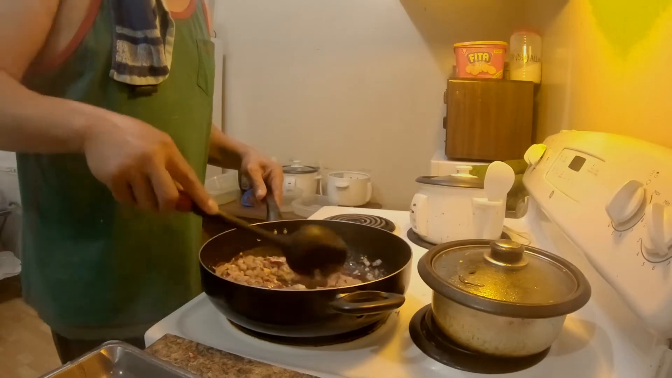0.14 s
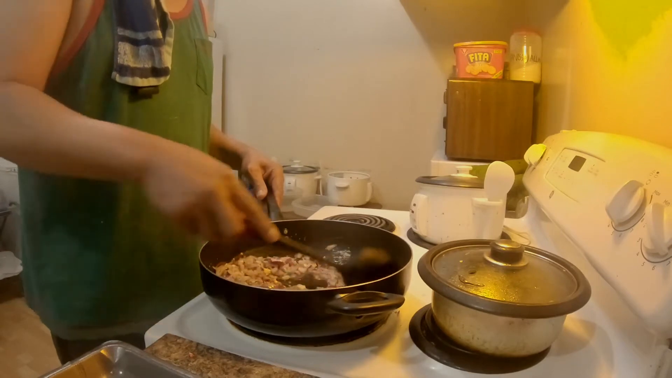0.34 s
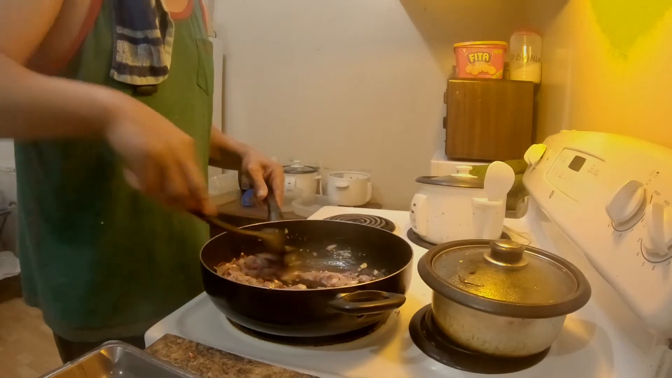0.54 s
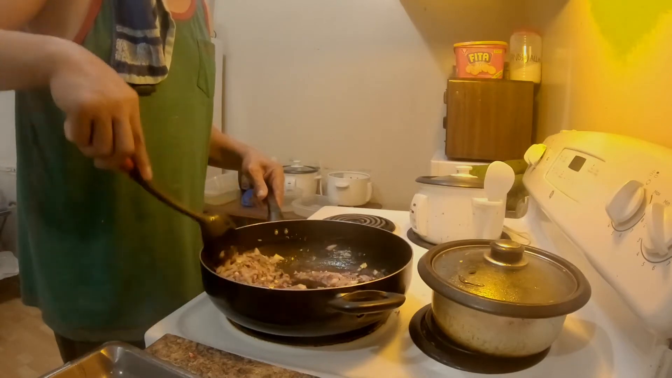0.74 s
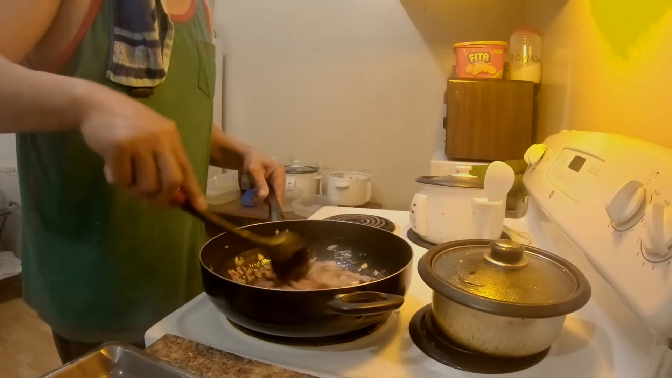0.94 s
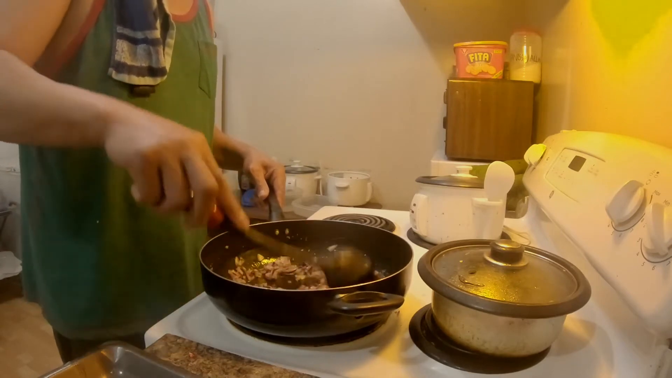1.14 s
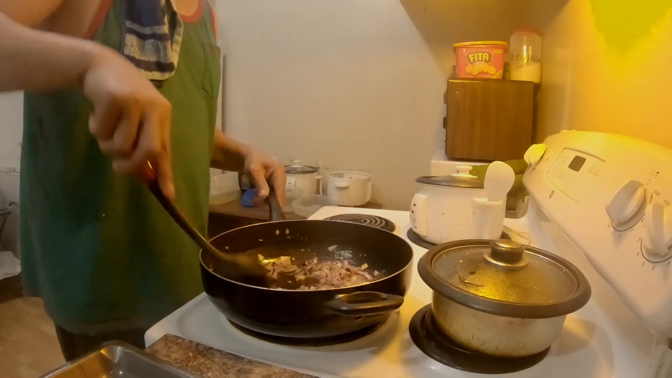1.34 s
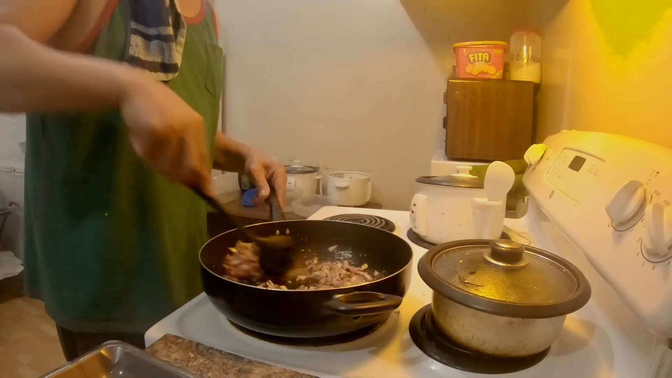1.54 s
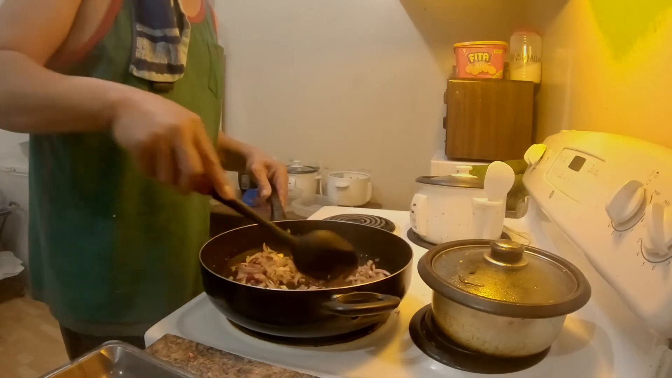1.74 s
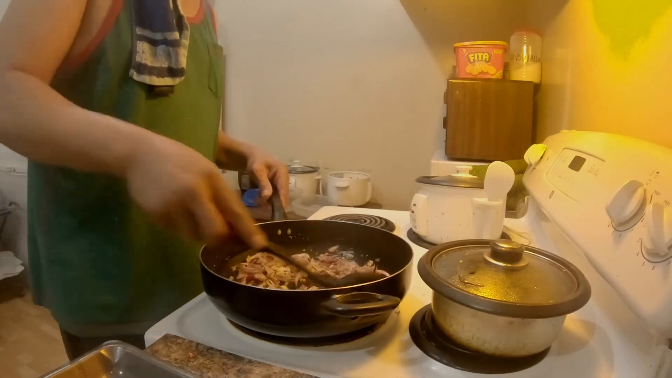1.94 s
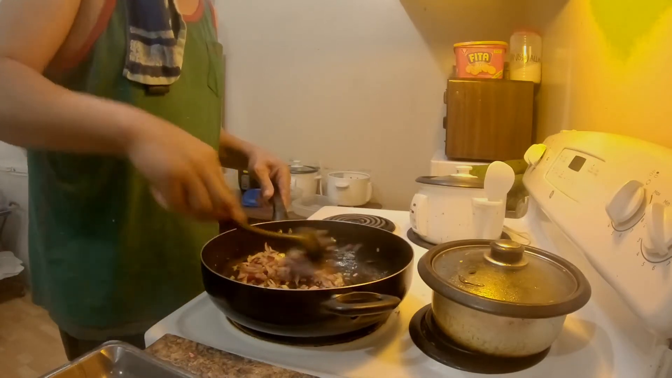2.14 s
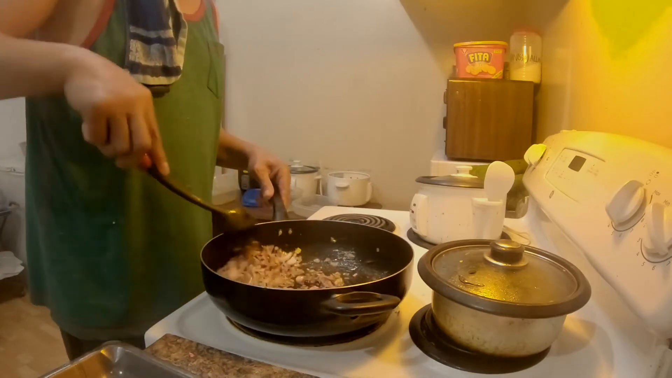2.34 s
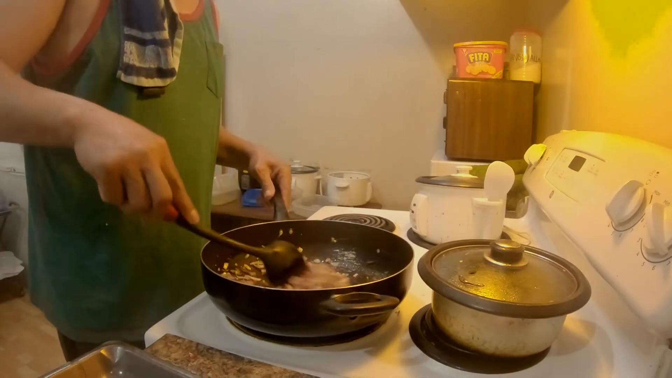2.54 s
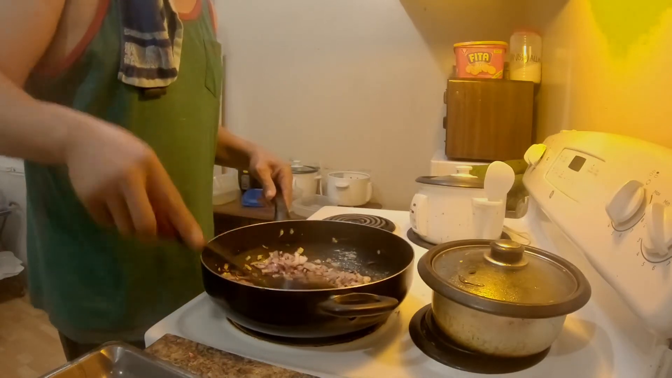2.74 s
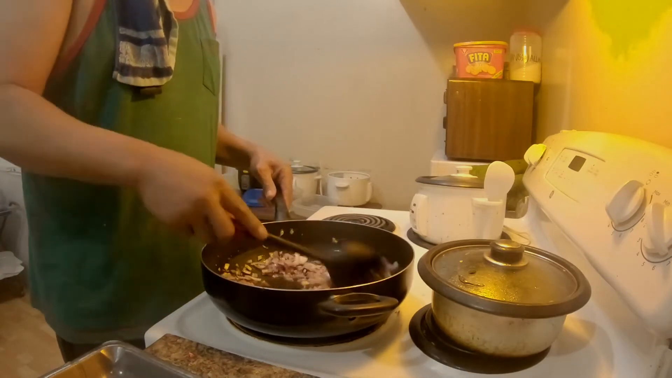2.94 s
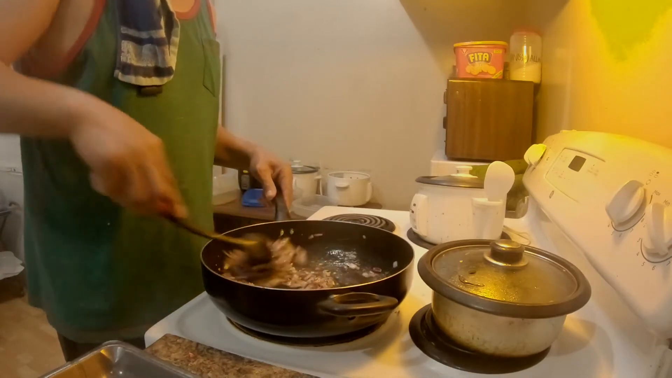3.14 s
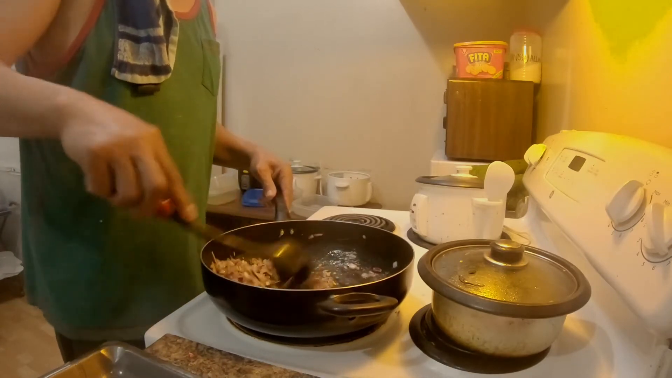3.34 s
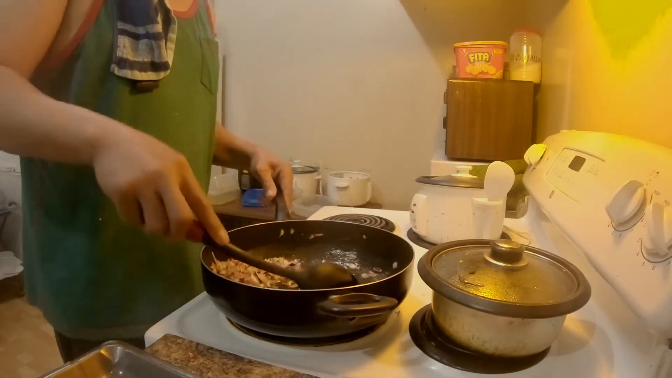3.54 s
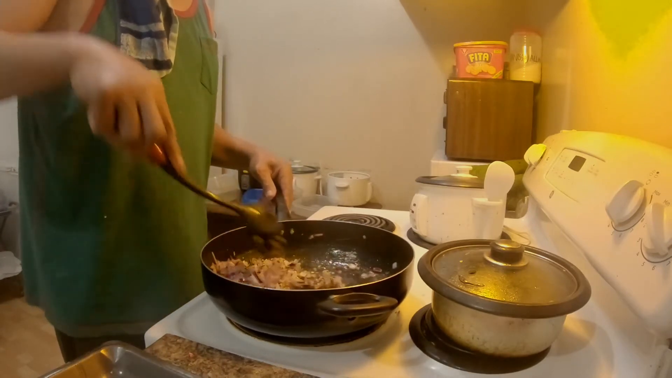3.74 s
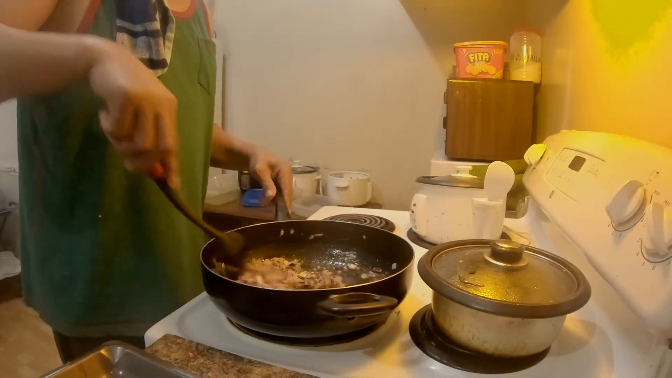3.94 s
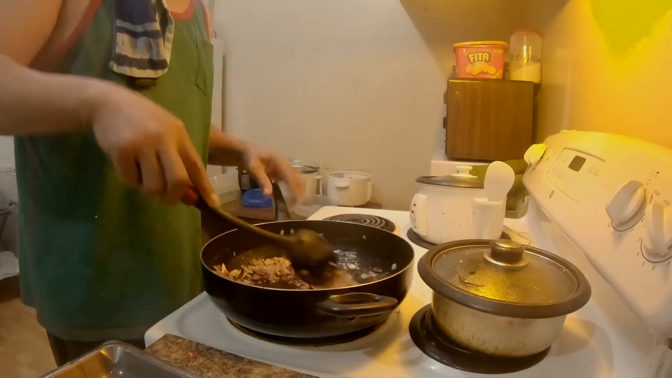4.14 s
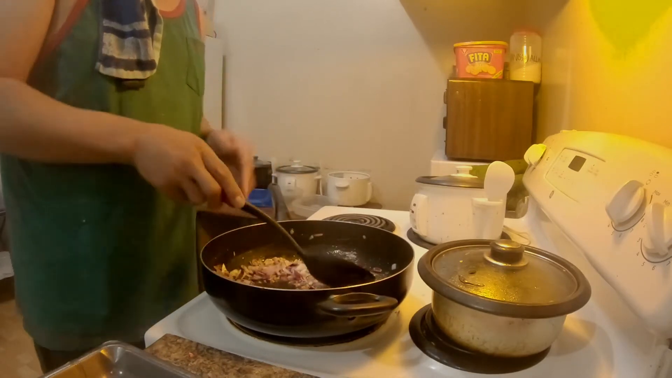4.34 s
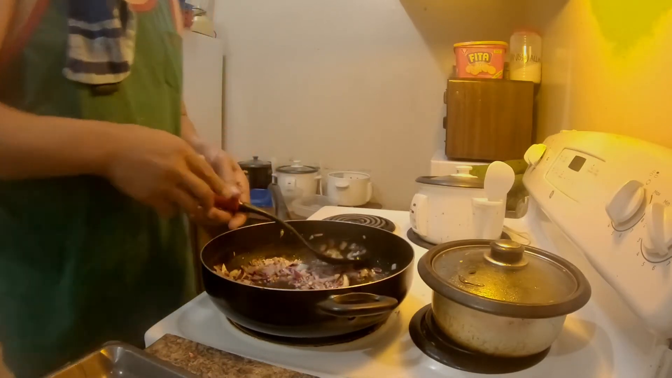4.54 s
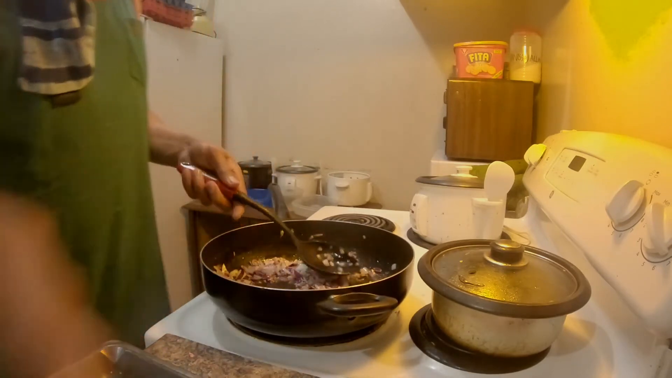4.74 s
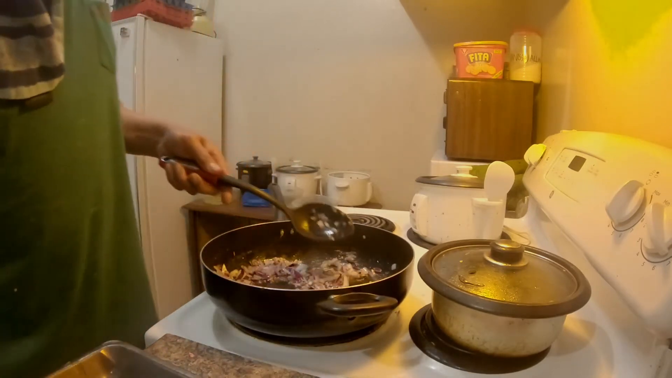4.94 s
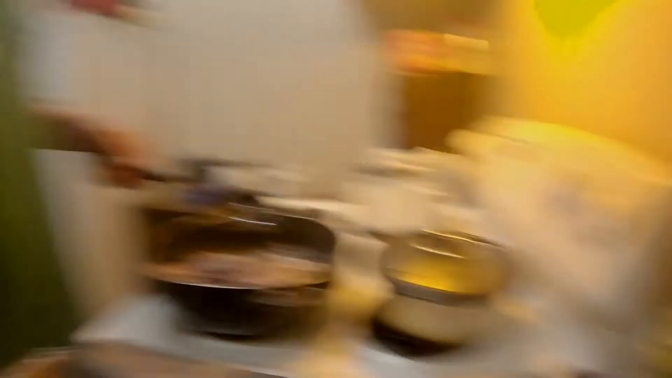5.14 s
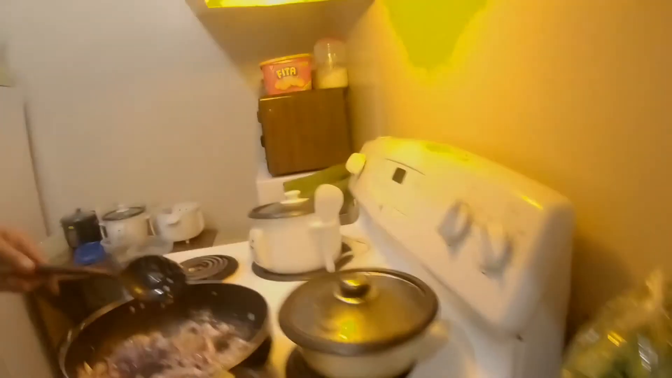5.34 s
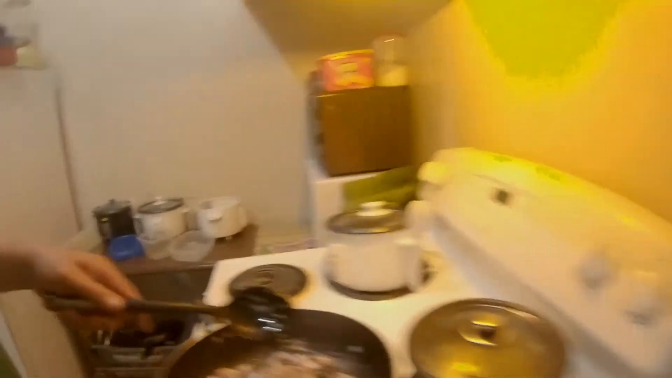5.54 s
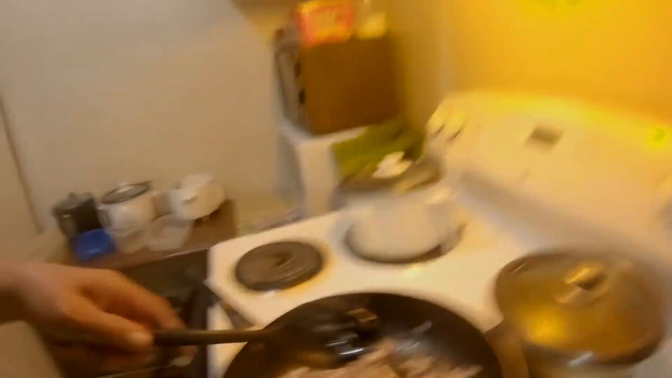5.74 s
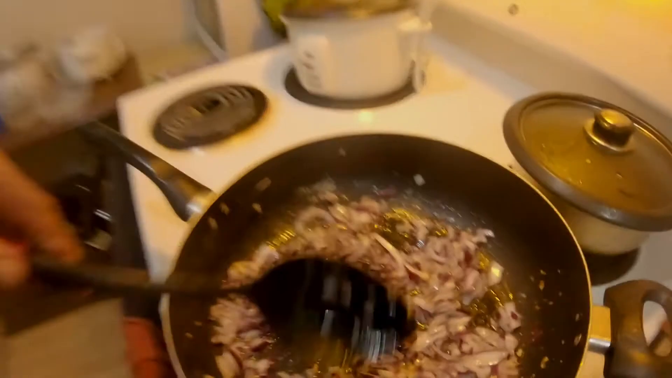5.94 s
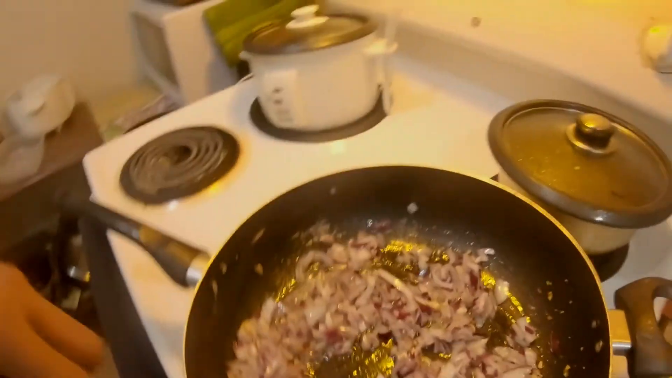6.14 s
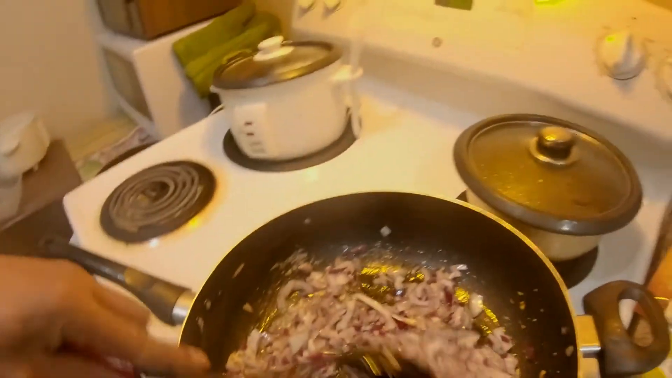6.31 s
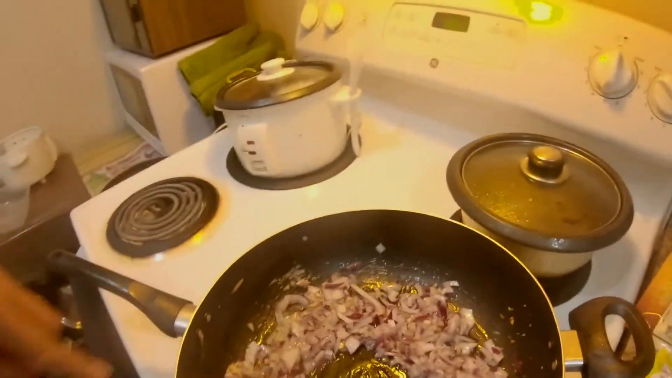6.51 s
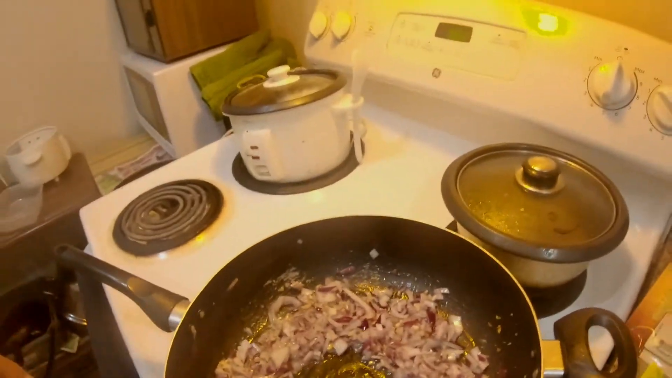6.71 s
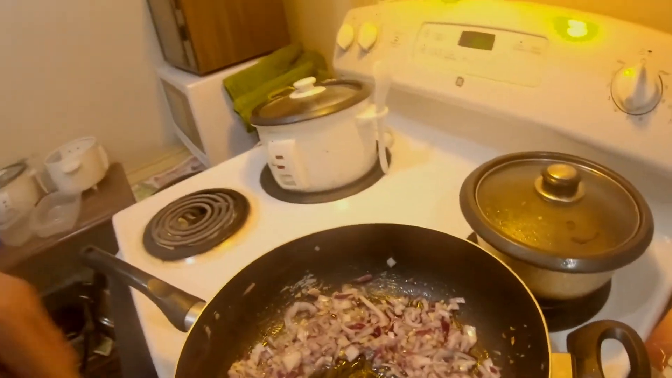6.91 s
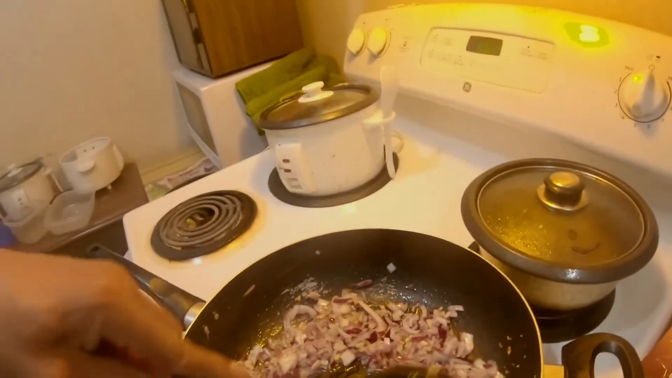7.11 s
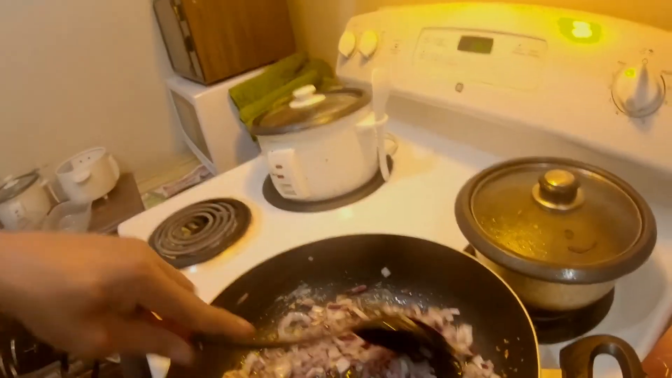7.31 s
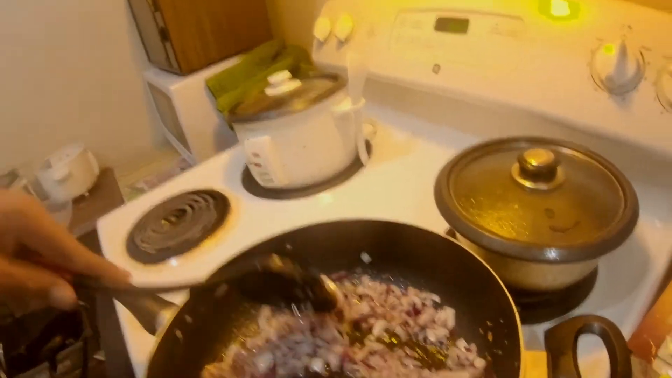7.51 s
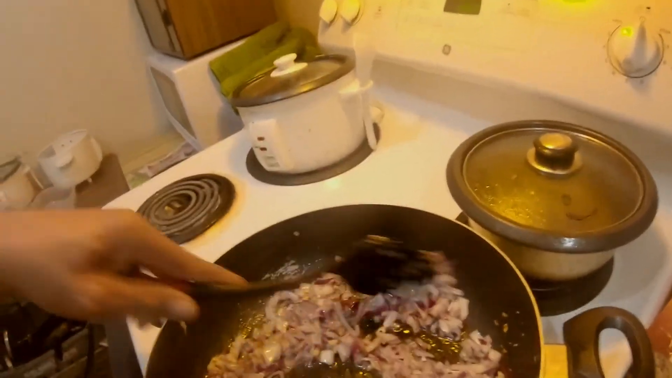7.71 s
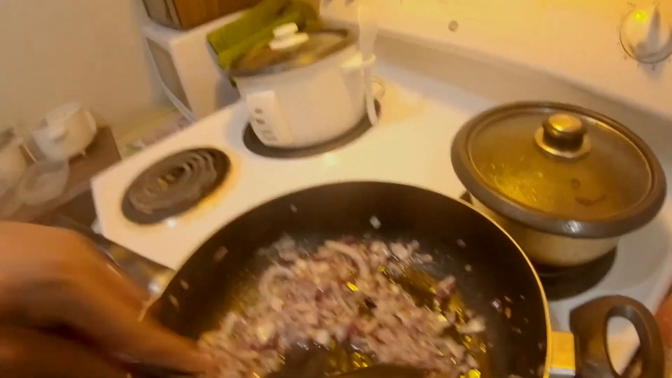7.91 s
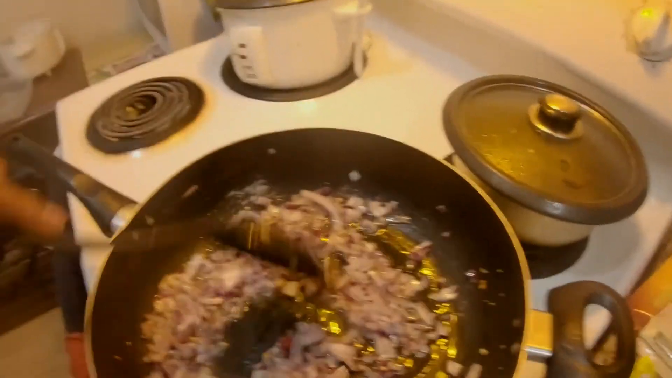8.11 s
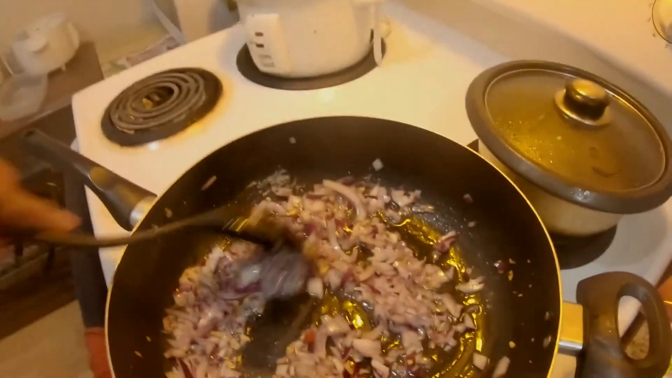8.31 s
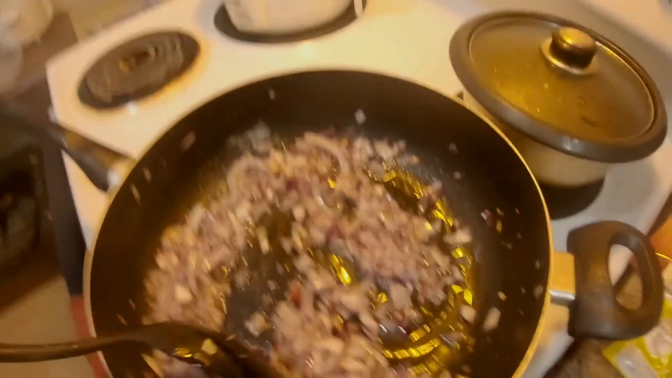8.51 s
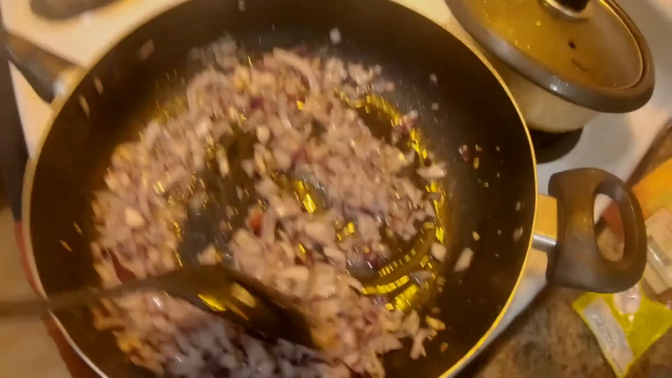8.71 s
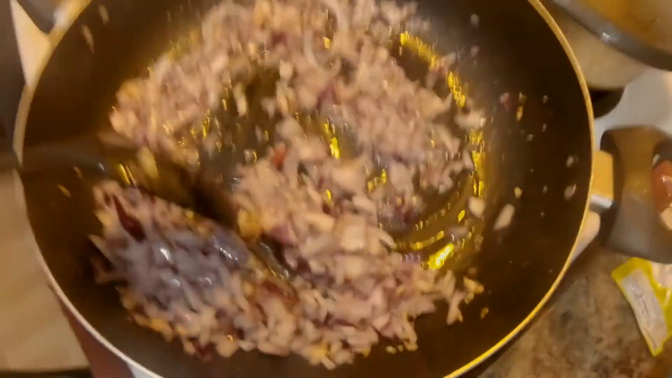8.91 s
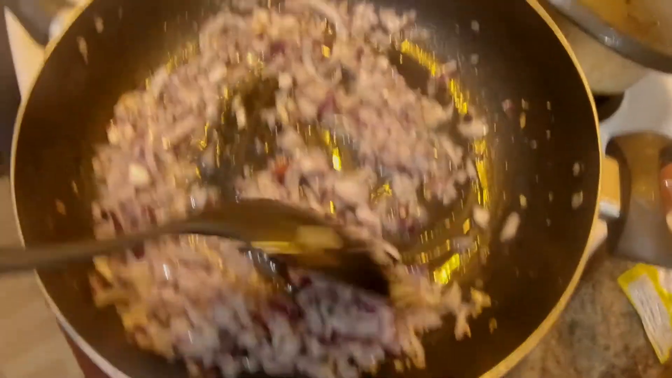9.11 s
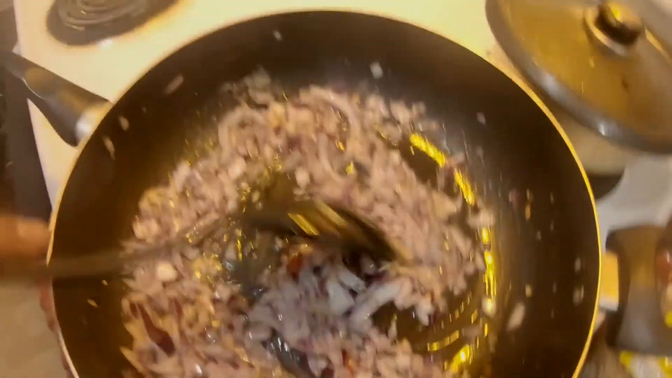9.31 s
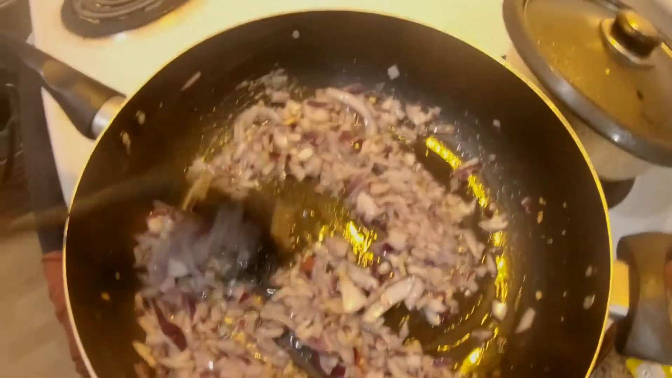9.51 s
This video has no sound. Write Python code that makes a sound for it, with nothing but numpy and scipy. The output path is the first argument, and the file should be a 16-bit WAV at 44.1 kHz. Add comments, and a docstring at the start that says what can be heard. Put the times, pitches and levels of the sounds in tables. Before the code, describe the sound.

Chopped onion fries in oil with a constant bright, crackling hiss. A spatula knocks and scrapes the metal pan, which wobbles lowly on the stove coil; drops of oil spit and bubbles pop. Halfway, the microphone is grabbed with a very loud bump and a gritty scuff, then carried over the pan. Sizzle and squeaky scrapes continue with dull finger thuds, in a small kitchen.

```python
"""First comes the hiss of chopped onion sizzling in oil, while a frying pan rocks on a stove coil below.
A spatula stirs, scraping and knocking the pan; oil spits, large bubbles pop, juice squelches.
Halfway through, the camera is picked up with a bump and a short scuff and is carried over the pan;
from then on fingers thud on its case and for about a second cover the microphone's highest treble.
Bubbles and scrapes are filtered clicks, blows are dying sines, and rumble and wobble are shaped noise."""
import sys
import numpy as np
from scipy import signal
from scipy.fft import rfft, irfft
from scipy.io import wavfile
from scipy.ndimage import uniform_filter1d

SR = 44100
rng = np.random.default_rng(int(sys.argv[2]) if len(sys.argv) > 2 else 0)


def dump(signal):
    """Clip the signal to [-1, 1] and save it as 16-bit WAV at the path in sys.argv[1]."""
    limited = np.clip(np.atleast_2d(signal).T, -1, 1)
    pcm = np.round(limited * 32767).astype(np.int16)
    wavfile.write(sys.argv[1], SR, pcm)


N = 426006
TIME = np.arange(N) / SR
LIFT_S, LIFT_TAKES_S = 4.99, 0.22  # the camera leaves its stand


def sizzle():
    """Countless tiny steam bubbles merge into a hiss; fewer, larger ones crackle out of it."""
    quick_flutter = gain_of(.85 * evened(uniform_filter1d(rng.standard_normal(N), 1200)))
    slow_surges = gain_of(.3 * evened(uniform_filter1d(rng.standard_normal(N), 3500)))
    flutter = quick_flutter * slow_surges
    hiss = evened(clicks(per_s=20000, spread_db=1.6))
    crackle = bubbles(per_s=2100, spread_db=3.8, low_hz=3800, high_hz=12000, q=4)
    pings = bubbles(per_s=45, spread_db=3.2, low_hz=6600, high_hz=10000, q=10)
    bursts = evened(flutter * (hiss + gain_of(-1) * crackle) + gain_of(-13.5) * pings)
    return steam_hiss(bursts) + sputter(hiss) + fizz(bursts, flutter)


# steam bubbles bursting in the oil: (frequency [Hz], relative density [dB per Hz])
STEAM_SPECTRUM = [(1500, -47), (2800, -60), (3700, -11.5), (4400, -2), (5000, 1.5), (5700, -1.5),
                  (7000, -13.5), (8200, -16.5), (9500, -23.5), (10800, -27.5), (14000, -53.5)]
# main hiss: (level in ordinary frying [dB], follows frying [dB per dB], change over the pan [dB],
# share of the fingers' loss that dims the whole layer)
HISS_LAYER = (-43.5, 1, 0, -0.04)


def steam_hiss(bursts):
    """The bursts reach the microphone directly and off nearby surfaces, in clusters that come and go."""
    heard = reflected(patchy(bursts, depth_db=1.0))
    return frying(*HISS_LAYER) * evened(colour(heard, STEAM_SPECTRUM))


# larger bubbles under the onion, from beside the pan: (frequency [Hz], relative density [dB per Hz])
SPUTTER_FROM_SIDE = [(200, -10), (440, -8.5), (560, -4), (720, 5.5), (900, -2), (1090, -4), (1290, -0.5),
                     (1600, -0.5), (1950, -0.5), (2250, -0.5), (2700, -1.5), (3600, -1.5), (5000, -9),
                     (9000, -18.5)]
# the same bubbles from over the pan: (frequency [Hz], relative density [dB per Hz])
SPUTTER_FROM_ABOVE = [(200, -29), (440, -2.5), (720, 2), (900, -4), (1130, 5.5), (1400, 2.5), (1750, 3.5),
                      (2250, -1), (2700, -2.5), (3400, -2), (5000, -18), (9000, -17.5)]
# sputter, same columns as HISS_LAYER: ([dB], [dB per dB], [dB], share)
SPUTTER_LAYER = (-49.5, 0.6, -0.5, 0.25)


def sputter(hiss):
    """Bubbles trapped under the onion sound lower and set the pan ringing faintly."""
    trapped = bubbles(per_s=1500, spread_db=2.8, low_hz=800, high_hz=4000, q=5, count=16)
    under_onion = hiss + gain_of(-4) * trapped
    metal = gain_of(-17) * evened(signal.oaconvolve(under_onion, ring(PAN_MODES))[:N])
    heard = reflected(under_onion)
    from_side = evened(colour(heard, SPUTTER_FROM_SIDE))
    from_above = evened(colour(heard, SPUTTER_FROM_ABOVE))
    moved = lifted()
    return frying(*SPUTTER_LAYER) * ((1 - moved) * from_side + moved * from_above + metal)


# finest bubbles: (frequency [Hz], relative density [dB per Hz])
FIZZ_SPECTRUM = [(8000, -38), (9800, -24), (11000, -26), (11500, -5.5), (12000, 2.5), (13000, -0.5),
                 (14500, -8), (15800, -16)]
# fizz, same columns as HISS_LAYER; the level is before the balance of the two ports: ([dB], [dB per dB], [dB], share)
FIZZ_LAYER = (-56, 1.18, -3, 0.5)


def fizz(bursts, flutter):
    """The shortest waves reach the two microphone ports differently, so each port adds its own prickle."""
    ports = []
    for _ in range(2):
        prickle = flutter * evened(clicks(per_s=1100, spread_db=4.8))
        ports.append(evened(colour(bursts + gain_of(3.0) * prickle, FIZZ_SPECTRUM)))
    balance = gain_of([[3.3], [.7]])  # first and second channel
    return frying(*FIZZ_LAYER) * balance * np.array(ports)


# how hard the onion fries: it eases until about 5.5 s, then picks up again: (time [s], level [dB])
FRYING_LEVELS = [(0, -39.5), (.8, -42.5), (1.7, -42.5), (1.85, -45), (2.3, -42.5), (4.05, -44),
                 (4.35, -45.5), (4.72, -47), (4.95, -46.5), (5.55, -47), (7, -45), (8.7, -42.5),
                 (9.65, -44.5)]
# wet onion turned onto hot metal flares up: (time at the strongest [s], half length [s], rise [dB])
FLARES = [(.5, 0.13, 1), (1.63, 0.18, 0.8), (5.89, 0.037, 5.5), (6.53, 0.18, 1.5), (7.2, 0.036, 2),
          (7.52, 0.08, 2), (7.9, 0.042, 3), (8.46, .08, 3), (8.93, 0.14, 1.5), (9.54, 0.12, 3)]
USUAL_DB = -44  # ordinary frying, on the scale of FRYING_LEVELS


def frying(db, follows, overhead_db, muffled):
    """Gain of one layer: it follows the frying and its flares, the camera's place and the fingers."""
    vigour_db = np.interp(TIME, *np.transpose(FRYING_LEVELS)) - USUAL_DB + swells(FLARES)
    return gain_of(db + follows * vigour_db + overhead_db * lifted() - muffled * covered())


# ringing of the pan: (frequency [Hz], relative level [dB], t60 [s])
PAN_MODES = [(330, 8, 0.041), (377.6, -2.5, 0.2), (518, -8.5, 0.2), (642, 4.5, 0.082), (733, 0, 0.072),
             (917, 2, 0.051), (1015, -4, 0.14), (1080, 0, 0.092), (1280, -13, 0.066), (1408, -9, 0.069),
             (1660, -14, 0.095), (1802, 7, 0.053), (1920, -24, 0.053), (2060, -2, 0.035), (2180, 2, 0.034),
             (2260, -3, 0.04), (3120, 0, 0.065), (4700, -17, .04)]
# dry contact of spatula and pan: (frequency [Hz], relative density [dB per Hz])
CLACK_SPECTRUM = [(150, -25.5), (350, 7.5), (700, -4), (1300, 1), (2200, -2), (2900, -5.5), (4000, -4),
                  (5000, 1), (7000, -30), (11000, -51)]
# spatula knocks: (time [s], level of the first 10 ms [dB], pitch of the flexing blade [Hz],
# narrowness of the contact [Q], t60 of the blade's note [s], its second note [Hz])
KNOCKS = [(.816, -33, 1396, 1.2, 0.041, 1970), (0.8177, -33.5, 2310, 1.6, .035, 1940),
          (.82, -25.5, 688, 2.7, 0.047, 1410), (.827, -34.5, 1015, 1.8, 0.088, 1390),
          (.839, -40, 1400, .6, .05, 2180), (1.392, -44, 1280, .56, .063, 2200),
          (2.119, -42.5, 1280, 3, .073, 1720), (2.834, -43, 720, .5, .05, 2180),
          (2.843, -37.5, 710, 1, 0.065, 450), (3.083, -40, 950, 0.71, 0.055, 1420),
          (6.871, -33.5, 1233, 0.96, 0.05, 1950), (6.879, -39.5, 810, 1.2, 0.033, 1680),
          (6.924, -43.5, 690, 1.1, 0.036, 1950), (7.365, -32, 464, 0.6, .05, 2450),
          (7.371, -41, 646, 1.3, 0.1, 330), (8.459, -32.5, 606, 1.6, 0.017, 1300),
          (8.4645, -31, 605, 1, 0.038, 1040), (8.483, -33.5, 614, 1.2, .04, 1530),
          (9.466, -19.5, 497, 1.4, 0.016, 790), (9.487, -33, 694, 2.4, .03, 1200)]
NOTE_DB, SECOND_DB = -0.5, -7.5  # the blade's two notes against the hit; the first is also scaled by Q
SECOND_LASTS = 0.44  # the second note dies in this share of the first one's time


def knocks():
    """The spatula meets the pan: a dry clack, the damped ring of the metal and two notes of the flexing blade."""
    out = np.zeros(N)
    for s, db, hz, q, t60, second_hz in KNOCKS:
        metal = ring(PAN_MODES)
        t = np.arange(len(metal)) / SR
        chatter = evened(rng.standard_normal(len(t)) * np.exp(-t / .007))
        clack = colour(evened(dispersed(len(t))) + chatter, CLACK_SPECTRUM)
        hit = evened(contact(evened(metal) + gain_of(1.5) * evened(clack), hz, q))
        note = gain_of(NOTE_DB) * q * evened(ring([(hz, 0, t60)]))  # a narrow contact sings more
        second = gain_of(SECOND_DB) * evened(ring([(second_hz, 0, SECOND_LASTS * t60)]))
        add(out, s, strike(hit + note + second, db))
    return out


# scraping strokes: (time at the strongest [s], rise [s], fall [s], level [dB], pitch [Hz],
# glide [octaves per s], share of squeak in the power [0-1])
SCRAPES = [(0.541, 0.069, 0.11, -49, 1280, 0.5, 0.06), (0.85, 0.031, 0.12, -46, 1220, 0, 0),
           (1.441, 0.05, 0.079, -50, 1280, 0, 0.05), (2.138, 0.013, 0.038, -47.5, 1380, 0, .6),
           (3.094, 0.0072, 0.057, -42.5, 706, 0, 0), (3.111, 0.022, 0.043, -49.5, 1390, 0, 0.1),
           (5.172, 0.01, 0.008, -40, 1440, 2, 0), (5.73, 0.066, 0.065, -49.5, 1640, 0.5, 0.5),
           (5.95, 0.021, 0.0074, -41, 1050, 2, 0.4), (6.415, 0.031, 0.077, -43, 1650, 0.5, 0.5),
           (6.48, .055, 0.041, -43.5, 520, 2, 0), (6.55, .035, 0.049, -36.5, 640, 5.5, 0.3),
           (6.578, 0.03, 0.021, -33, 1660, 2, 0.36), (6.899, 0.018, 0.019, -42.5, 1080, -4, 0),
           (7.48, .055, 0.035, -49.5, 1500, 0, 0.04), (7.492, 0.027, .02, -46.5, 400, -1, 0.04),
           (7.9, .085, .06, -45.5, 1280, -1, 0.2), (8.485, 0.025, 0.026, -50, 1740, -1, 0),
           (8.71, 0.091, 0.067, -49, 590, 2, 0), (8.509, .03, .04, -48, 520, 3, 0),
           (9.568, .017, .015, -33.5, 676, -10, 0.76), (9.586, .016, 0.0086, -37, 1210, -4, 0.04)]
RUB_TOP_HZ = 2630  # the soft blade rubs out little above this


def scrapes():
    """The blade sticks and slips over the pan; pressed hard it squeaks at a pitch that can slide as it bends."""
    out = np.zeros(N)
    for s, rise, fall, db, hz, glide, squeak in SCRAPES:
        t = np.arange(-2 * rise, 2 * fall, 1 / SR)
        unevenness = evened(uniform_filter1d(rng.standard_normal(len(t)), 350))
        pressure = gain_of(2.0 * unevenness)  # the blade catches unevenly
        slips = pressure * clicks(per_s=1400, spread_db=2.6, count=len(t))
        metal = signal.oaconvolve(slips, ring(PAN_MODES))[:len(t)]
        rub = evened(metal) + gain_of(9.0) * evened(colour(slips, CLACK_SPECTRUM))
        rub = signal.sosfilt(signal.butter(2, RUB_TOP_HZ, fs=SR, output="sos"), rub)
        rub = evened(contact(contact(rub, hz, q=0.69), hz, q=0.45))
        pitch = hz * 2 ** (glide * t)
        note = evened(resonate(resonate(slips, pitch, .17 * hz), pitch, .17 * hz))
        note = evened(note / (uniform_filter1d(note ** 2, 200) + .05) ** .3)  # stick-slip steadies the swing
        stroke = np.sqrt(1 - squeak) * rub + np.sqrt(squeak) * note
        envelope = np.exp(-(t / np.where(t < 0, rise, fall)) ** 2)
        add(out, s + t[0], gain_of(db) * stroke * envelope)
    return out


# spitting oil drops: (time [s], relative peak level [dB])
SPITS = [(0.166, -31), (.817, -18.5), (1.169, -32), (2.139, -29.5), (2.833, -25.5), (4.086, -31),
         (5.269, -28.5), (5.597, -42), (5.685, -31.5), (6.091, -20.5), (7.366, -28), (7.869, -33),
         (8.424, -32), (9.465, -25)]
# a drop bursting: (frequency [Hz], relative density [dB per Hz])
SPIT_SPECTRUM = [(800, -19), (2000, -19.5), (3300, -21), (4900, -2), (6200, -11), (8000, -29), (10800, -46),
                 (12300, -37), (15800, -43)]


def spits():
    """Single drops of water burst in the oil, each with a short spray."""
    out, t = np.zeros(N), np.arange(1500) / SR
    for s, db in SPITS:
        spray = gain_of(-21) * rng.standard_normal(len(t)) * np.exp(-t / .003)
        pop = colour(signal.unit_impulse(len(t)) + spray, SPIT_SPECTRUM)
        add(out, s + 0.00079, gain_of(db + 5.5) * pop / abs(pop).max())
    return out


# large bubbles that pop clear of the hiss: (time [s], peak level [dB], starting pitch [Hz])
POPS = [(3.044, -32, 6500), (3.509, -33, 3700), (4.036, -31.5, 6560), (5.374, -34, 6000),
        (6.263, -36, 6900), (6.626, -34, 7000), (6.872, -34, 7240), (7.718, -30, 5870), (7.893, -30, 6100),
        (7.981, -27, 5270), (8.76, -34, 7200), (9.263, -33.5, 7600)]


def pops():
    """Single large bubbles burst, each a tiny ping that rises as it opens."""
    out, t = np.zeros(N), np.arange(500) / SR
    for s, db, hz in POPS:
        envelope = np.exp(-t / .0006) * (1 - np.exp(-t / .0002))
        ping = np.sin(2 * np.pi * hz * t * (1 + 50 * t)) * envelope
        add(out, s, gain_of(db) * ping / abs(ping).max())
    return out


# the blade squeezes juice out of the onion: (time at the strongest [s], half length [s], level [dB])
SQUELCHES = [(1.66, 0.044, -45), (5.71, .04, -51), (7.2, .04, -50), (7.86, 0.056, -48),
             (8.465, 0.048, -44.5), (9.58, .06, -54)]


def squelches():
    """Juice pressed onto the hot metal crackles at a middling pitch."""
    return effort(SQUELCHES) * bubbles(per_s=1500, spread_db=3.6, low_hz=1900, high_hz=4200, q=5)


# bumps on the camera and the stove: (time [s], peak level [dB], settled pitch [Hz], t60 [s])
THUDS = [(.865, -31, 120, .14), (.913, -29, 119, 0.073), (2.028, -32, 117, 0.067),
         (2.835, -28, 104.6, 0.099), (3.088, -39, 230, .13), (3.308, -34.5, 125, 0.18),
         (4.552, -35, 117, 0.33), (5.1939, -0.5, 237, 0.018), (5.194, -13.5, 580, 0.053),
         (5.208, -7, 133, 0.038), (5.242, -25, 80, 0.12), (5.286, -11, 58.7, 0.05),
         (5.3157, -18, 129, 0.17), (5.49, -25, 300, 0.051), (5.495, -32, 125, 0.14),
         (5.872, -23, 166, 0.043), (5.878, -10, 127, 0.11), (5.892, -22, 55.3, 0.27),
         (5.953, -20, 159, 0.072), (6.004, -16.5, 148, 0.073), (6.205, -21, 139, 0.15),
         (6.669, -24.5, 136, 0.069), (6.872, -38, 220, 0.066), (7.367, -33, 209, 0.16),
         (8.078, -26.5, 171, 0.11), (8.093, -22, 165, 0.043), (8.134, -29, 145, 0.051),
         (8.836, -25, 197, 0.061), (8.918, -21, 145, 0.18), (8.976, -11, 128, 0.11),
         (9.466, -22, 303, 0.066)]
# dull sound of the camera's case: (frequency [Hz], relative density [dB per Hz])
CASE_SPECTRUM = [(20, -16), (42, 3.5), (85, -5.5), (135, 4.5), (190, -4), (300, -7), (450, -15.5),
                 (800, -30), (2000, -31), (8000, -112)]


def thuds():
    """Soft blows: a low, quickly damped swing and a dull puff from the case."""
    out, t = np.zeros(N), np.arange(9000) / SR
    for s, db, hz, t60 in THUDS:
        decay = np.exp(-np.log(1000) * t / t60)
        turns = hz * (t + 0.0018 * (1 - np.exp(-t / 0.0048)))  # the contact is stiffest at first, so the pitch sinks
        swing = np.sin(2 * np.pi * turns) * decay * (1 - np.exp(-t * hz / 0.69))
        puff = colour(rng.standard_normal(len(t)) * decay ** 2, CASE_SPECTRUM)
        thud = evened(swing) + gain_of(-9) * evened(puff)
        add(out, s, gain_of(db) * thud / abs(thud).max())
    return out


# hard taps on the case: (time [s], peak level of the push [dB], hardness as corner [Hz],
# relative rattle level [dB], t60 of the rattle [s])
TAPS = [(5.1925, -3, 1400, -3, 0.027), (5.2761, -23, 1200, 2, 0.027), (5.281, -9.5, 480, -15, 0.024),
        (5.491, -26, 620, 3.5, 0.086), (5.509, -31, 520, -2, 0.046), (5.8671, -21, 754, -1, 0.057),
        (5.8825, -17.5, 700, -2.5, 0.072), (6.005, -24, 1510, 2, .022)]
# loose parts of the case: (frequency [Hz], relative density [dB per Hz])
RATTLE_SPECTRUM = [(150, -12), (330, 5), (580, 5.5), (800, -12), (1250, 1.5), (2200, 5.5), (3200, -10),
                   (4700, 16), (8000, -22)]


def taps():
    """Hard blows reach the microphone through the camera's case, with no room: one push and a short rattle."""
    out, t = np.zeros(N), np.arange(6000) / SR
    for s, db, hz, rattle_db, t60 in TAPS:
        u = 2 * np.pi * hz * t
        push = (u / 2) ** 2 * np.exp(2 - u)
        loose_parts = colour(rng.standard_normal(len(t)), RATTLE_SPECTRUM)
        rattle = evened(signal.oaconvolve(loose_parts, push)[:len(t)])
        rattle = gain_of(rattle_db - 2.0) * rattle * np.exp(-np.log(1000) * t / t60)
        add(out, s, gain_of(db) * (push + rattle))
    return out


# the camera scuffs off its stand: (time at the strongest [s], half length [s], level [dB], centre [Hz])
SCUFFS = [(5.199, .004, -17.5, 1150), (5.212, 0.007, -22.5, 1200), (5.226, 0.008, -15, 2050),
          (5.242, .005, -25, 1800)]
# partials of its squeak on the stand: (frequency [Hz], relative level [dB])
SCUFF_MODES = [(1020, -2.5), (1120, -3), (1295, 1.5), (1630, -7), (1895, -0.5), (2325, -5), (4560, -14)]
# grit under that squeak: (frequency [Hz], relative density [dB per Hz])
GRIT_SPECTRUM = [(300, -5), (1200, 4.5), (2400, 3), (2900, -6), (3900, -7.5), (4600, 2), (5600, -12),
                 (8000, -36)]
GRIT_DB = -11  # grit that drags along with each judder, relative to its squeak


def scuffs():
    """The camera squeaks off its stand in quick, gritty judders of wavering partials."""
    out = np.zeros(N)
    for s, half, db, centre in SCUFFS:
        t = np.arange(-3 * half, 3 * half, 1 / SR)
        squeak = np.zeros(len(t))
        wander = evened(uniform_filter1d(rng.standard_normal((len(SCUFF_MODES), len(t))), 60))
        for (hz, level), waver in zip(SCUFF_MODES, 1 + .03 * wander):
            turns = np.cumsum(hz * waver) / SR + rng.random()
            squeak += gain_of(level) * np.sin(2 * np.pi * turns)
        grit = evened(colour(clicks(per_s=4000, spread_db=6.0, count=len(t)), GRIT_SPECTRUM))
        judder = evened(contact(squeak, centre, q=1.6)) + gain_of(GRIT_DB) * grit
        add(out, s + t[0], gain_of(db) * judder / np.cosh(2.0 * t / half))
    return out


# the hand shifts its grip on the camera: (time at the strongest [s], half length [s], level [dB])
GRIPS = [(5.235, 0.088, -20), (5.47, 0.095, -36), (5.74, 0.082, -36.5), (5.92, 0.2, -35.5),
         (6.17, 0.1, -40), (6.96, 0.069, -39), (8.1, 0.045, -28.5), (8.52, 0.23, -41), (8.71, 0.052, -43.5),
         (8.9, 0.17, -35)]
HOLD_DB = -46.5  # rumble of the hand holding still


def grip_rumble():
    """Once the camera is lifted, many small finger contacts rumble through its case."""
    rumble = evened(colour(clicks(per_s=540, spread_db=0.5), CASE_SPECTRUM))
    return lifted() * effort(GRIPS, HOLD_DB) * rumble


# pushes of the spatula that rock the pan: (time at the strongest [s], half length [s], level [dB])
PUSHES = [(.05, 0.12, -39), (.54, 0.14, -38), (.9, 0.12, -41), (1.38, 0.13, -40), (1.7, 0.13, -42.5),
          (2.03, 0.19, -41), (2.18, 0.096, -37.5), (2.58, 0.2, -40), (2.92, 0.076, -38), (3.5, 0.046, -44),
          (4.23, 0.14, -39.5), (4.57, 0.031, -41), (4.9, 0.066, -41.5)]
# low wobble of the pan on its coil: (frequency [Hz], relative density [dB per Hz])
ROCKING_SPECTRUM = [(20, -32), (45, -16.5), (80, -14), (102, -8), (120, 2.5), (150, -10), (195, -7),
                    (260, -23), (450, -32), (900, -55)]
IDLE_ROCK_DB = -44.5  # the pan between pushes


def rocking():
    """Each push sets the pan wobbling on its springy coil, heard through the stand until the camera is lifted."""
    wobble = colour(rng.standard_normal(N), ROCKING_SPECTRUM)
    own_swell = np.sqrt(abs(uniform_filter1d(wobble ** 2, 5000)))  # divided out: the arm's push sets the strength
    return (1 - lifted()) * effort(PUSHES, IDLE_ROCK_DB) * wobble / own_swell


# fingers over the microphone shade its treble: (time at the deepest [s], half length [s], loss [dB])
FINGERS = [(5.65, 0.17, 22), (6.2, 0.3, 7.5)]


def covered():
    """Loss in dB under the fingers, which come and go quickly."""
    return swells(FINGERS, squareness=2.6)


def shaded(x):
    """The fingers block the shortest waves, above 11.5 kHz, on their way to the microphone."""
    high_pass = signal.firwin(101, 11500, pass_zero=False, fs=SR)
    top = signal.oaconvolve(x, high_pass[None], "same")
    return x - top * (1 - gain_of(-covered()))


# hard surfaces next to the pan: (extra path [s], level [dB], change of path while the camera moves [s per s])
SURFACES = [(.0018, -18, -.00021), (.00215, -22.5, .00016), (.0027, -21.5, -.00033), (.0061, -17.5, .0004)]


def reflected(x):
    """Echoes off the stove and the wall ripple the spectrum; the ripples slide from the lift onwards."""
    moving_s = np.maximum(TIME - LIFT_S, 0)
    out = x.copy()
    for delay, db, drift in SURFACES:
        out += gain_of(db) * np.interp(TIME - delay - drift * moving_s, TIME, x, left=0)
    return out


# how long the kitchen rings: (frequency [Hz], t60 [s])
KITCHEN_DECAY = [(150, 0.96), (500, 0.25), (1500, 0.46), (4000, 0.22), (12000, 0.3)]


def kitchen(x, size=22050):
    """Small room: dense reflections, each band dying at its own speed."""
    echoes = clicks(per_s=3300, spread_db=0.5, count=size) * (np.arange(size) / SR > .005)
    hz, t, z = signal.stft(echoes, SR, nperseg=256)
    decay = np.exp(-np.log(1000) * t / read(KITCHEN_DECAY, hz)[:, None])
    tail = signal.istft(z * decay, SR, nperseg=256)[1]
    return signal.oaconvolve(x, tail / np.linalg.norm(tail))[:N]


def lifted():
    """0 while the camera is on its stand, 1 once it is in the hand."""
    return np.clip((TIME - LIFT_S) / LIFT_TAKES_S, 0, 1)


def clicks(per_s, spread_db, count=N, limit=2.0):
    """Random clicks, most small and a few large."""
    sizes = gain_of(spread_db * np.minimum(rng.exponential(1, count), limit))
    return sizes * rng.choice([-1, 1], count) * (rng.random(count) < per_s / SR)


def bubbles(per_s, spread_db, low_hz, high_hz, q, count=12):
    """Each bubble rings for a few cycles at a pitch set by its size."""
    bursts, size = clicks(per_s, spread_db), rng.integers(0, count, N)
    pitches = np.geomspace(low_hz, high_hz, count)
    return evened(sum(contact(bursts * (size == k), hz, q) for k, hz in enumerate(pitches)))


def patchy(x, depth_db):
    """Clusters of like bubbles come and go, each lifting a narrow band for a moment."""
    z = signal.stft(x, nperseg=512)[2]
    across_bands = uniform_filter1d(rng.standard_normal(z.shape), 5, 0)
    patches = evened(uniform_filter1d(across_bands, 5, 1))
    return signal.istft(z * gain_of(depth_db * patches), nperseg=512)[1][:N]


def ring(modes, size=11025):
    """Dying modes, each starting at its own point of the swing."""
    t = np.arange(size) / SR
    swings = np.zeros(size)
    for hz, db, t60 in modes:
        decay = np.exp(-np.log(1000) * t / t60)
        swings += gain_of(db) * decay * np.sin(2 * np.pi * (hz * t + rng.random()))
    return swings * np.sin(np.pi / 2 * np.minimum(t / .0008, 1)) ** 2  # soft start


def contact(x, hz, q):
    """A broad band-pass: a soft, flat contact sounds low, the hard edge high."""
    return signal.lfilter(*signal.iirpeak(hz, q, SR), x)


def dispersed(size):
    """A blow smeared into a quick falling sweep: short bending waves outrun the long ones."""
    spread_s = .0028  # a 1 kHz bending wave crosses the pan in this time
    hz = np.fft.rfftfreq(size, 1 / SR)
    return irfft(np.exp(-4j * np.pi * spread_s * np.sqrt(1000 * hz)), size)


def resonate(x, hz, width_hz):
    """A resonance that follows a pitch curve."""
    turn = np.exp(2j * np.pi * np.cumsum(hz) / SR)
    r = np.exp(-np.pi * width_hz / SR)
    return (turn * signal.lfilter([1 - r], [1, -r], x / turn)).real


def strike(x, db, size=441):
    """Scales a blow by the strength of its first moments."""
    return gain_of(db) * x / np.sqrt(np.mean(x[:size] ** 2))


def swells(rows, power=1, squareness=2):
    """Sum of smooth humps, each with its time, half length and height."""
    return sum(height ** power * np.exp(-power * abs((TIME - s) / half) ** squareness)
               for s, half, height in rows)


def effort(rows, rest_db=-120):
    """Strength of separate movements that add roughly in power over a resting level."""
    humps = [(s, half, gain_of(db)) for s, half, db in rows]
    return np.sqrt(gain_of(rest_db) ** 2 + swells(humps, power=2.108))


def gain_of(db):
    """Decibels to amplitude."""
    return 10 ** (np.asarray(db) / 20)


def evened(x):
    """Scales to an rms of one."""
    return x / np.sqrt(np.mean(x ** 2) + 1e-20)


def read(points, hz):
    """Reads a spectrum on a log-frequency axis."""
    f, value = np.transpose(points)
    return np.interp(np.log(hz + 1), np.log(f + 1), value)


def colour(x, points, size=8192):
    """Causal minimum-phase filter with the given spectrum, floored at -100 dB."""
    log_gain = np.log(gain_of(np.maximum(read(points, np.fft.rfftfreq(size, 1 / SR)), -100)))
    cepstrum = irfft(log_gain)
    cepstrum[1:size // 2] *= 2  # fold the cepstrum forward in time
    cepstrum[size // 2 + 1:] = 0
    response = irfft(np.exp(rfft(cepstrum)))[:size // 2]
    return signal.oaconvolve(x, response)[:len(x)]


def add(mix, s, sound):
    """Mixes a sound in at a time."""
    part = mix[max(round(s * SR), 0):][:len(sound)]
    part += sound[:len(part)]


def scene():
    """Everything is heard from straight ahead, save the finest fizz."""
    pan = knocks() + scrapes() + spits() + pops() + squelches()
    camera = thuds() + taps() + scuffs() + grip_rumble()
    return shaded(sizzle()) + pan + camera + rocking() + gain_of(-9.0) * kitchen(pan)


def record(dry):
    """A soft ceiling rounds off the loudest peaks; then a low-pass limits the band to 15.8 kHz."""
    rounded = dry / (1 + (dry / .95) ** 4) ** .25
    low_pass = signal.firwin(511, 15800, window=("kaiser", 9), fs=SR)
    return signal.oaconvolve(rounded, low_pass[None], "same")


dry = scene()
out = record(dry)
dump(out)
```